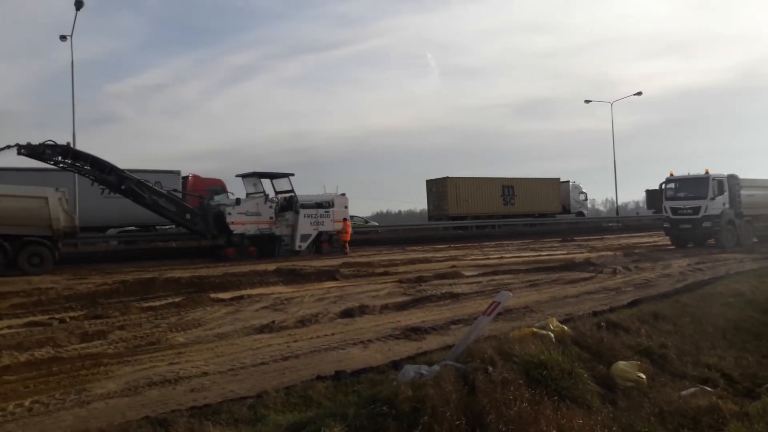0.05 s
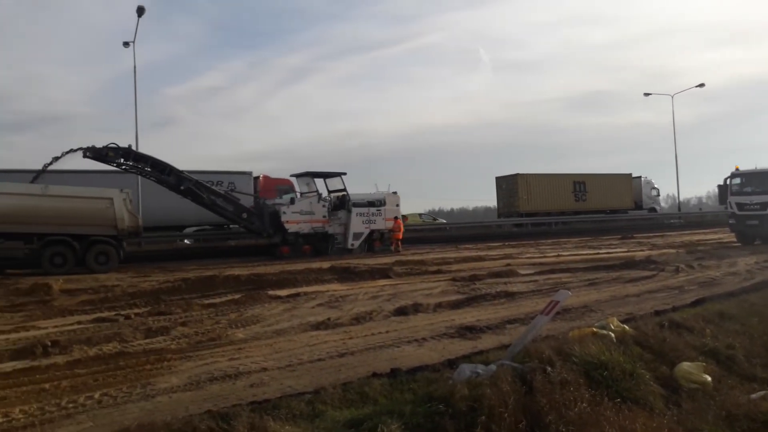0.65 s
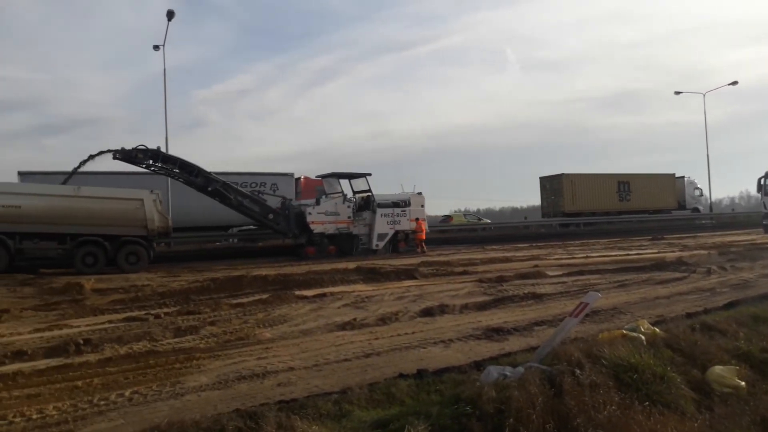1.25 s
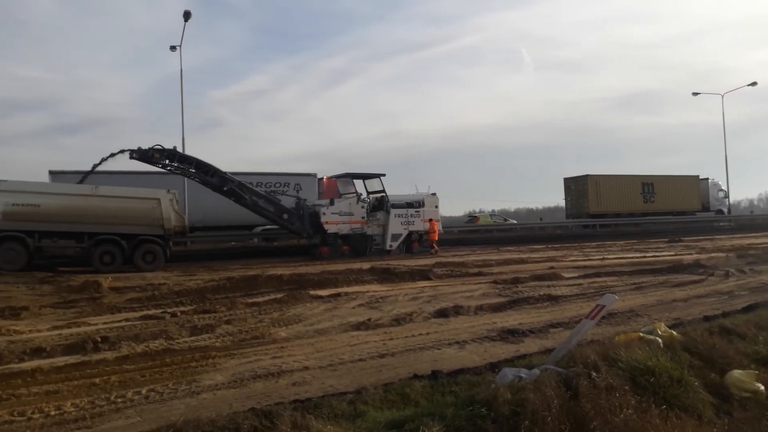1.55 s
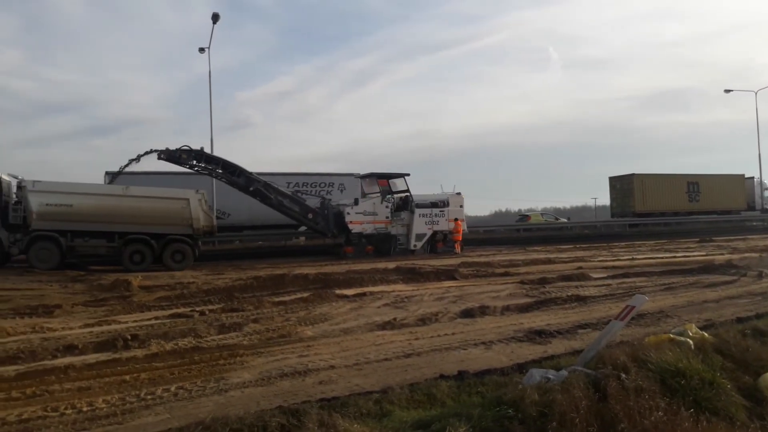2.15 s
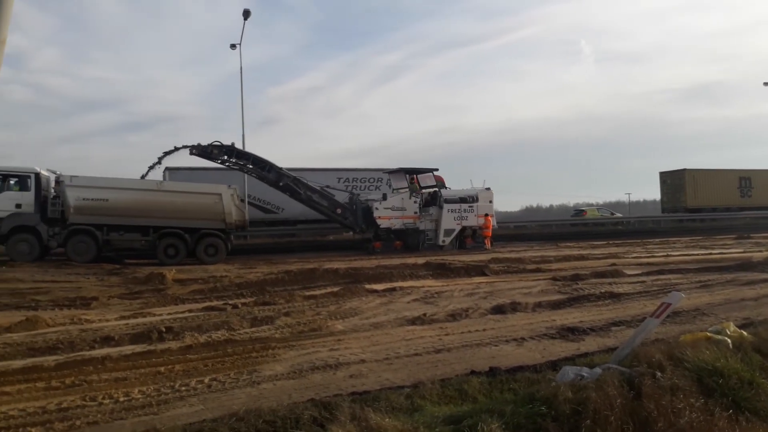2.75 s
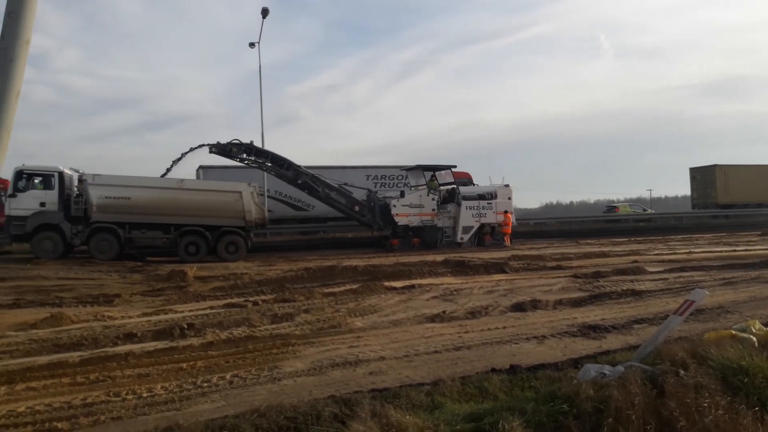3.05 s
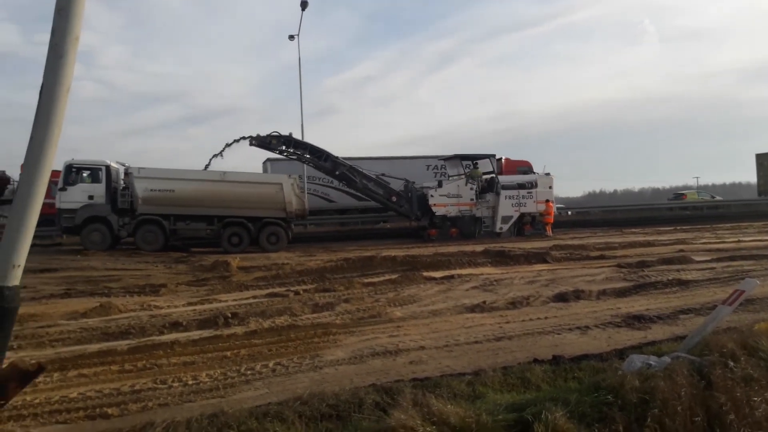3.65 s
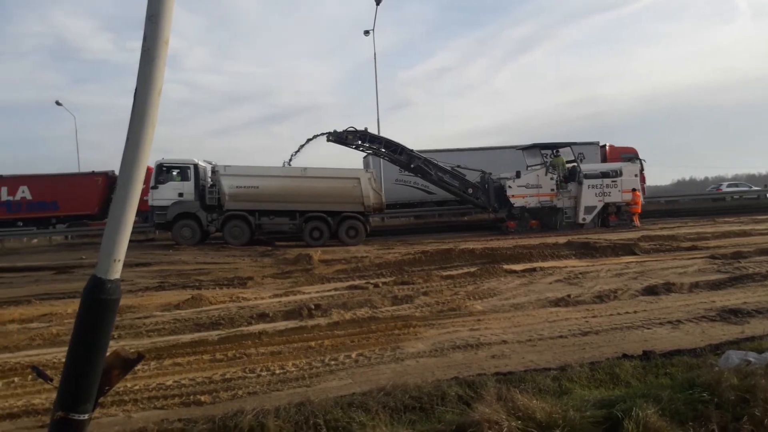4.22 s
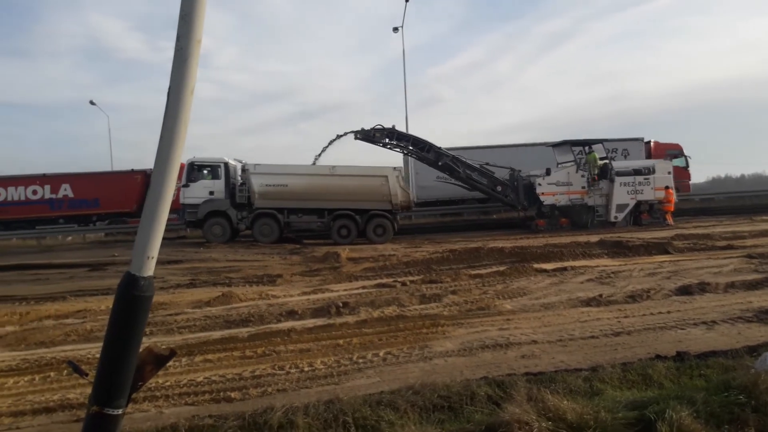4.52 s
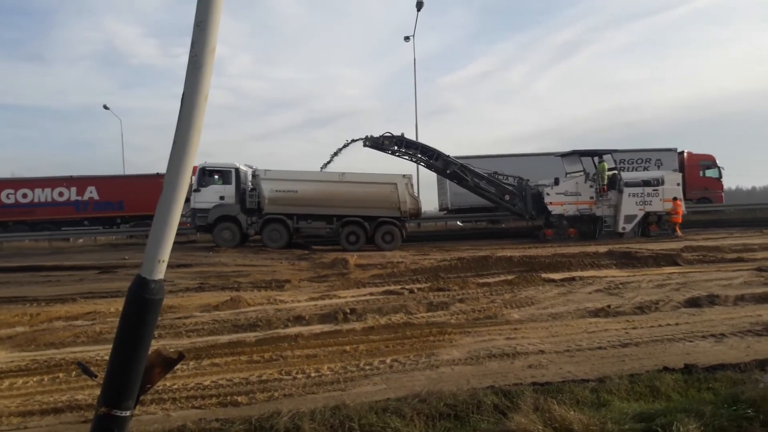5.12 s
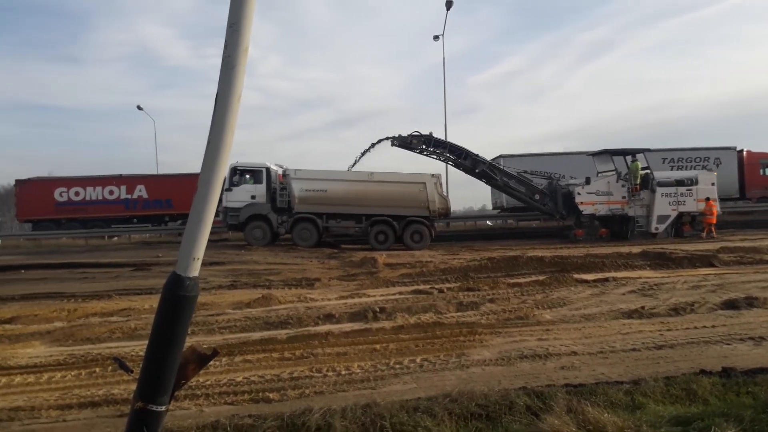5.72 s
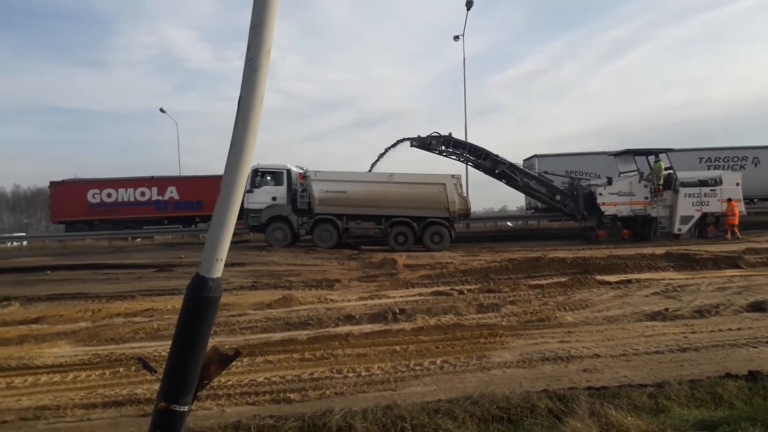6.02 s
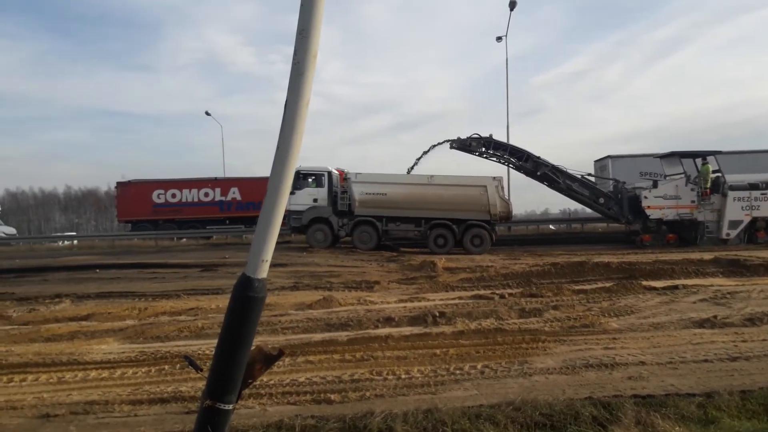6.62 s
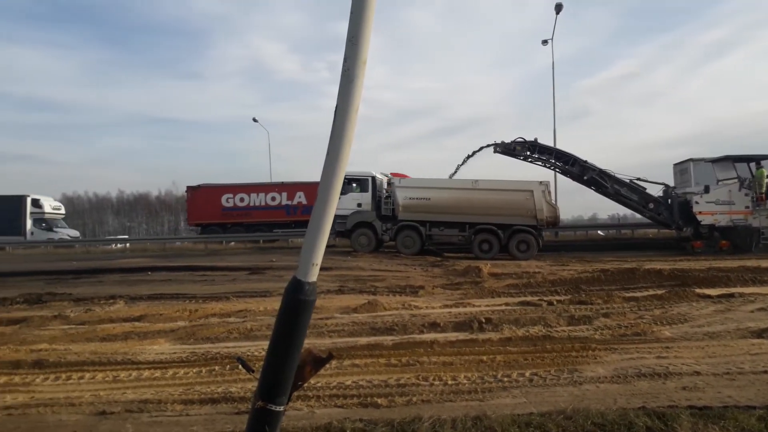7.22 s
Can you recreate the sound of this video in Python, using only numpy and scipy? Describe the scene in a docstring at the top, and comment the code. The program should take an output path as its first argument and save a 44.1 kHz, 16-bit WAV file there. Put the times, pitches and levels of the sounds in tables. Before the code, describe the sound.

Wind buffets the microphone over the distant diesel drone and grinding hiss of a road milling machine and passing trucks.

```python
"""A steady grinding hiss and a diesel drone: a road milling machine cuts asphalt some way off.
Its drum crushes stone, its drive whines, and tyre roar from trucks on the highway beside it mixes in.
Close up, and often louder than the works, gusts buffet the microphone: a hollow flutter over a low
rumble, tearing into crackle when they are strongest."""
import sys
import numpy as np
from scipy import signal
from scipy.fft import rfft, irfft
from scipy.io import wavfile
from scipy.ndimage import uniform_filter1d, minimum_filter1d, map_coordinates

SR = 44100
rng = np.random.default_rng(int(sys.argv[2]) if len(sys.argv) > 2 else 0)


def file_out(sig):
    """Save sig as 16-bit WAV at sys.argv[1]."""
    # one column per channel
    cols = np.atleast_2d(sig).T
    # limit, then scale
    lim = np.clip(cols, -1, 1)
    pcm = np.round(lim * 32767).astype(np.int16)
    wavfile.write(sys.argv[1], SR, pcm)


N = 320607
TIME = np.arange(N) / SR
BINS = np.fft.rfftfreq(N, 1 / SR)
GUST_RELEASE_S = .02

# the din of the works sinks and returns: time_s, level_db
WORKS_LEVEL = [(0.0, -44), (0.2, -44.5), (0.79, -47.5), (1.29, -44.5), (2.15, -48), (3.12, -54),
               (3.77, -55.5), (5.1, -48.5), (5.61, -44.5), (7.27, -45)]
# gusts on the microphone: start_s, rise_s, length_s, level_db, pitch_hz
MIC_GUSTS = [(0.122, 0.035, 0.067, -17.5, 198.8), (0.281, 0.17, 0.16, -6, 285.5),
             (1.006, 0.046, 0.075, -10, 205.5), (1.118, .02, 0.037, -11.5, 199.4),
             (1.206, 0.021, 0.056, -16.5, 211.1), (1.29, 0.071, 0.19, -13, 270.6),
             (1.47, .03, 0.095, -7, 262.5), (1.569, 0.028, .41, -11.5, 231.7),
             (2.027, .035, .045, -14, 253.8), (2.126, 0.027, 0.14, -12.5, 239.2),
             (2.268, 0.1, 0.21, -11, 219.9), (2.469, 0.11, 0.3295, -13, 242.6),
             (2.799, 0.028, 0.37, -13, 245.2), (3.151, 0.019, 0.24, -18.5, 219.8),
             (3.377, 0.031, 0.23, -16.5, 234.4), (3.611, .04, 0.26, -12.5, 247.9),
             (3.86, 0.052, .2, -11.5, 262.1), (4.058, 0.021, .16, -14, 230.5),
             (4.273, .02, 0.12, -20.5, 245.9), (4.44, 0.093, 0.26, -14, 237.5),
             (4.777, 0.019, 0.057, -15, 228.2), (5.009, .015, 0.0287, -22.5, 219),
             (5.08, .015, 0.027, -18.5, 214.5), (5.322, 0.032, 0.1905, -21.5, 195),
             (5.527, 0.031, 0.12, -14, 215.4), (5.693, .015, .03, -20.5, 209),
             (5.901, 0.033, 0.14, -27, 172.2), (6.208, 0.027, 0.049, -26, 174.7),
             (6.468, .015, 0.029, -22, 214.5), (6.569, 0.019, 0.075, -21.5, 235.8),
             (6.709, 0.036, 0.063, -19.5, 245.7), (6.95, 0.045, 0.2, -19.5, 238.5),
             (7.148, 0.053, 0.091, -14, 244.4)]
# the wind freshens, then drops: time_s, speed_ratio
WIND_TREND = [(0, 0.65), (1.6, 0.65), (2.2, 0.86), (2.5, 0.9), (3.0, 1.043), (3.6, 1.11), (4.5, .96),
              (5.6, 0.85), (6.3, 0.74), (7.27, 0.76)]


def grinding():
    """Distant picks crush asphalt in countless small blows that ring the machine, mixed with tyre roar."""
    # the roar before and after the trucks go by: frequency_hz, level_db
    roar_before = [(25, -26), (60, -8), (160, 3.5), (280, -5), (480, -15.5), (800, -5), (1000, -13.5),
                   (1300, -7), (1550, -20), (2100, -17), (2600, -15), (3000, -29.5), (5600, -26),
                   (7900, -61)]
    roar_after = [(25, -21.5), (60, -6), (160, 5.5), (280, -6), (420, -8.5), (830, -10), (960, -17.5),
                  (1100, -12), (1480, -19), (2100, -20.5), (2600, -20), (3100, -28.5), (5600, -27),
                  (7900, -61)]
    # blend towards the later colour: time_s, late_share
    trucks_passing = [(0, 0.3), (1.5, 0.5), (3, 0.7), (5.2, 1), (6, 1), (7.27, 0.8)]
    # peaks in the roar, narrow machine resonances and a broad late swell of tyre noise:
    # centre_hz, width_hz, early_db, late_db
    roar_peaks = [(1255, 88, 2.5, 3), (1751, 330, 0, 10.5), (2400, 70, 8.5, 3.5), (3430, 86, 8.5, 4),
                  (3860, 140, 4.5, 3.5), (5170, 250, 6.5, 2.5)]
    chips_per_s, air_db, over_level_db = 500, -59, 20.5
    chips = rng.standard_normal(N) * (rng.random(N) < chips_per_s / SR)
    blows = evened(rng.standard_normal(N) + 0.34 * evened(chips))
    early_db, late_db = spectrum_db(roar_before), spectrum_db(roar_after)
    for hz, width, early_boost, late_boost in roar_peaks:
        bell = 1 / (1 + (2 * (BINS - hz) / width) ** 2)
        early_db += early_boost * bell
        late_db += late_boost * bell
    late_share = follow(trucks_passing)
    roar = (1 - late_share) * coloured(blows, early_db) + late_share * coloured(blows, late_db)
    roar = coloured(roar, spectrum_db([(7700, -2), (8600, -25)]))
    roar += gain_of(air_db) * rng.standard_normal(N)
    # turbulent air makes the treble flicker more than the bass
    treble = coloured(roar, spectrum_db([(700, -39), (2000, -6)]))
    roar = (roar - treble) * gain_of(1.1 * wander(14)) + treble * gain_of(1.5 * wander(22))
    return evened(roar) * gain_of(follow(WORKS_LEVEL) + over_level_db)


def engine():
    """A six-cylinder diesel drones under load and its drive whines, both wavering in the moving air."""
    # tones of the diesel: crankshaft_multiple, level_db
    engine_orders = [(3, -28), (4.5, -33), (5, -33.5), (6, -38), (8, -41), (12, -47), (16.5, -49),
                     (20, -49), (24, -45), (30, -50), (34.5, -49), (35, -47), (40, -53), (51, -50)]
    # the drone swells and sinks: time_s, gain_db
    drone_level = [(0, -2.5), (.6, -0.5), (1.8, -9), (3.6, -0.5), (5, -6.5), (5.9, 1.5), (6.6, -3.5),
                   (7.27, 0.5)]
    # the whine fades and returns, relative to WORKS_LEVEL: time_s, gain_db
    whine_level = [(0, 3), (1.3, 3), (2.2, 6.5), (4, -9), (5.3, -5.5), (5.9, 4.5), (7.27, 8)]
    whine_hz, whine_order = 2451.3, 70
    speed = 1 + .0011 * wander(4) + .00098 * wander(30)
    crank_turns = np.cumsum(whine_hz * speed) / SR / whine_order
    drone = np.zeros(N)
    for order, db in engine_orders:
        drone += gain_of(db + 1.9 * wander(7)) * np.sin(2 * np.pi * (order * crank_turns + rng.random()))
    whine_db = follow(WORKS_LEVEL) + follow(whine_level) + 1.4 * wander(7.4) + 0.9 * wander(45)
    whine = gain_of(whine_db) * np.sin(2 * np.pi * whine_order * crank_turns)
    return drone * gain_of(follow(drone_level)) + whine


def wind_flutter():
    """Small eddies flutter in the microphone port, the pitch gliding from gust to gust."""
    # colour of the flutter at base_hz: frequency_hz, level_db
    flutter_colour = [(40, -40.5), (90, -18), (150, -4), (215, -3), (285, -5), (380, -12.5), (600, -24.5),
                      (1100, -57), (3000, -94.5)]
    base_hz = 232
    pitch_hz = follow([(start + length / 2, hz) for start, _, length, _, hz in MIC_GUSTS])
    flutter = eddies(flutter_colour, unevenness=.17, churn_hz=34.725, push=1, pace=pitch_hz / base_hz)
    return flutter * gust_strength(GUST_RELEASE_S)


def wind_rumble():
    """Large eddies rumble on the microphone, swelling less than each gust and lingering after it."""
    # colour of the rumble: frequency_hz, level_db
    rumble_colour = [(20, -27), (40, -14.5), (65, -1.5), (100, 6), (150, -10), (300, -28), (600, -86.5)]
    # single large eddies that thump: start_s, length_s, level_db
    big_eddies = [(2.3, .16, -22.5), (2.53, 0.095, -29), (2.837, .1, -17.5), (2.995, .12, -27.5),
                  (4.533, 0.082, -23), (4.8, 0.068, -21.5), (5.528, 0.078, -25)]
    rumble_db, typical_gust_db = -32, -15.5
    rise_s, release_s = .045, .06
    heave = (gust_strength(release_s) / gain_of(typical_gust_db)) ** 0.9
    heave *= gain_of(rumble_db) * follow(WIND_TREND) ** 0.62
    thumps = sum(swell(start, rise_s, length, db, release_s) for start, length, db in big_eddies)
    return eddies(rumble_colour, unevenness=.1, churn_hz=20, push=.8) * np.hypot(heave, thumps)


def wind_tearing():
    """Strong flow tears off the microphone's case and breaks into crackling eddies and steep fronts."""
    # bursts of torn flow: start_s, length_s, level_db, fineness_ratio (scales the crackle's frequencies)
    tears = [(0.411, 0.035, -24, .68), (1.631, 0.033, -17.5, 0.69), (1.721, 0.061, -27, 0.73),
             (1.845, 0.038, -20.5, 0.86), (2.052, 0.026, -21.5, 0.79), (2.112, .01, -19.5, 0.96),
             (2.186, 0.02, -22.5, 0.81), (2.328, 0.076, -23, 1.12), (2.448, .014, -19, 1.07),
             (2.533, 0.046, -21, 1.26), (2.62, 0.029, -25, .79), (2.73, .022, -20.5, 0.83),
             (2.825, .04, -15.5, 0.97), (2.885, .13, -20.5, 1.3), (3.029, .11, -23.5, 1.1),
             (3.223, 0.074, -24.5, 1.13), (3.403, 0.026, -19, 1.01), (3.474, .012, -23, 1.11),
             (3.52, 0.089, -20, 1.3), (3.645, 0.034, -20.5, 1.09), (3.71, 0.047, -19.5, 1.06),
             (3.815, .02, -21, 1.24), (3.847, .04, -15.5, 1.11), (3.94, 0.12, -21.5, 0.89),
             (4.174, 0.061, -19, 1.114), (4.28, 0.064, -23, .98), (4.417, 0.01173, -23, 1.0),
             (4.457, 0.064, -20, 1.09), (4.568, 0.057, -22, .93), (4.659, 0.031, -20, 1.044),
             (4.81, 0.041, -21.5, 0.84), (5.453, 0.022, -24, 0.86), (5.553, .035, -18, 1.035),
             (5.61, .02, -23, 0.99), (5.701, 0.013, -24, 0.78), (6.476, 0.0099, -26, 0.78),
             (6.57, 0.069, -29, 0.82), (6.723, 0.021, -18.5, 0.77), (6.99, 0.12, -24.5, 0.74),
             (7.19, .08, -25.5, 0.72)]
    # colour of the crackle: frequency_hz, level_db
    crackle_colour = [(60, -28.5), (250, -5.5), (450, 12), (700, 0), (1100, -7), (1700, -24.5),
                      (2500, -51.5), (3600, -44.5), (6000, -91.5)]
    # the microphone port dulls the treble: frequency_hz, gain_db
    port_response = [(2500, 1), (4000, -2.5), (5500, -10), (8000, -33)]
    rise_s, release_s = .008, .012
    # every gust crackles a little, and more in a faster wind
    gust_crackle = gust_strength(GUST_RELEASE_S) * gain_of(-13) * follow(WIND_TREND) ** 1.1
    burst_power = sum(swell(start, rise_s, length, db, release_s) ** 2 for start, length, db, _ in tears)
    strength = np.sqrt(gust_crackle ** 2 + burst_power)
    fineness = follow([(start + length / 2, fine) for start, length, _, fine in tears])
    crackle = eddies(crackle_colour, unevenness=.33, churn_hz=259.2, push=.73, pace=fineness)
    crackle *= strength * gain_of(2.5)
    return coloured(crackle, spectrum_db(port_response)) + pressure_fronts(strength, fineness)


def pressure_fronts(strength, fineness):
    """Steep fronts snap, more often in finer turbulence; the hardest slap and trail a ragged wake."""
    # the hardest single eddies: start_s, level_db (before slap_boost_db)
    slaps = [(1.8741, -14.5), (2.3402, -11.5), (2.4528, -14), (2.568, -16), (2.5769, -11), (2.8476, -15.5),
             (2.9092, -12), (2.9312, -11), (2.9452, -11), (2.9902, -12.5), (3.0116, -12), (3.1159, -12.5),
             (3.2309, -15.5), (3.4789, -16.5), (3.5068, -8.5), (3.83, -14), (4.0606, -18), (4.1948, -18),
             (4.5147, -13), (4.6791, -13.5), (5.5621, -13.5)]
    # colour of one front: frequency_hz, level_db
    front_colour = [(60, -22.5), (200, 2.5), (500, 0.5), (1200, 2.5), (2200, -8), (3200, -17),
                    (4300, -29.5), (7000, -66.5)]
    snap_boost_db, slap_boost_db = 3.5, 8
    snaps_per_s = 170 * fineness ** 5
    fronts = (rng.random(N) < snaps_per_s / SR) * rng.uniform(-1.03, 1, N)
    fronts *= strength * gain_of(snap_boost_db)
    for start_s, db in slaps:
        wake = .028 * rng.standard_normal(1024) * np.exp(-TIME[:1024] / .004)
        wake[0] = rng.choice([-1, 1])  # a push or a suck leads the wake
        first = round(start_s * SR)
        fronts[first:first + len(wake)] += gain_of(db + slap_boost_db) * wake
    return signal.oaconvolve(fronts, sharpest_pulse(front_colour))[:N]


def eddies(colour, unevenness, churn_hz, push, pace=1):
    """A frozen field of eddies swept past unevenly: faster is brighter and harder. Held near rms 1."""
    field = coloured(rng.standard_normal(N), spectrum_db(colour))
    speed = np.exp(unevenness * 2 * np.tanh(wander(churn_hz) / 2))
    place = np.cumsum(pace * speed / speed.mean())
    pressure = map_coordinates(field, [place], order=3, mode="mirror") * speed ** push
    power = uniform_filter1d(uniform_filter1d(pressure ** 2, size=1000), size=1000)
    return pressure / np.sqrt(abs(power) + 1e-20)


def gust_strength(release_s):
    """The gusts and the light breeze between them, summed in power."""
    breeze_db = -36
    gust_power = sum(swell(*gust[:4], release_s) ** 2 for gust in MIC_GUSTS)
    return np.sqrt(gain_of(breeze_db) ** 2 + gust_power)


def swell(start_s, rise_s, length_s, db, release_s):
    """One push of air: a smooth rise, a hold until its length is over, an exponential release."""
    first, last = np.searchsorted(TIME, [start_s, start_s + length_s + 10 * release_s])
    age, strength = TIME[first:last] - start_s, np.zeros(N)
    attack = np.sin(np.pi / 2 * np.clip(age / rise_s, 0, 1)) ** 2
    strength[first:last] = gain_of(db) * attack * np.exp(-np.maximum(age - length_s, 0) / release_s)
    return strength


def sharpest_pulse(colour):
    """The quickest-starting (minimum-phase) pulse of this colour, with a peak of 1."""
    log_gain = spectrum_db(colour) * np.log(10) / 20
    cepstrum = irfft(log_gain, N)
    cepstrum[1:] *= 2 * (np.arange(1, N) < N / 2)
    pulse = irfft(np.exp(rfft(cepstrum)), N)[:2048]
    return pulse / abs(pulse).max()


def gain_of(db):
    """Decibels to gain."""
    return 10 ** (np.asarray(db) / 20)


def evened(x):
    """Scales to rms 1."""
    return x / np.sqrt(np.mean(x ** 2) + 1e-20)


def spectrum_db(points):
    """Joins (frequency_hz, level_db) points on a log-frequency axis, giving dB for every bin."""
    hz, db = np.transpose(points)
    return np.interp(np.log(BINS + 1), np.log(hz + 1), db)


def follow(points):
    """Joins (time_s, value) points, giving a value for every sample."""
    return np.interp(TIME, *np.transpose(points))


def coloured(x, db):
    """Filters x by a gain in dB for every bin."""
    return irfft(rfft(x) * gain_of(db), N)


def wander(hz):
    """Smooth random drift of rms 1, changing up to about hz times a second."""
    return evened(irfft(rfft(rng.standard_normal(N)) * np.exp(-(BINS / hz) ** 2), N))


def scene():
    """One microphone by the highway: the works in the distance, the wind right on top of it."""
    works = engine() + grinding()
    wind = wind_flutter() + wind_rumble() + wind_tearing()
    fade = np.clip(np.minimum(TIME, TIME[-1] - TIME) / .003, 0, 1)
    return (fade * (works + wind))[None]


def record(dry):
    """The recorder's fast limiter holds the gusts under full scale; a low-pass trims the top treble."""
    ceiling, cutoff_hz = .97, 15750
    safe_gain = np.minimum(1, ceiling / (abs(dry) + 1e-9))
    held_gain = minimum_filter1d(safe_gain, size=241)
    limited = dry * uniform_filter1d(uniform_filter1d(held_gain, size=121), size=121)
    low_pass = signal.firwin(511, cutoff_hz, window=("kaiser", 9), fs=SR)
    return signal.oaconvolve(limited, low_pass[None], "same")


dry = scene()
out = record(dry)
file_out(out)
```